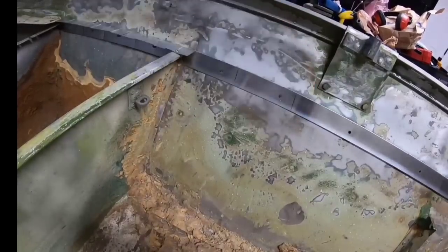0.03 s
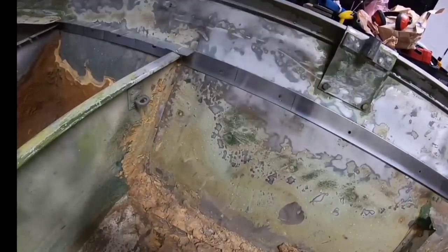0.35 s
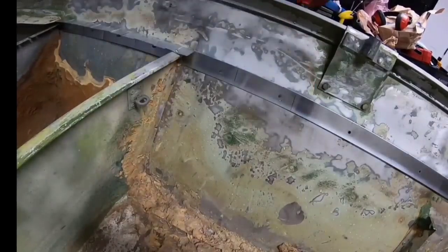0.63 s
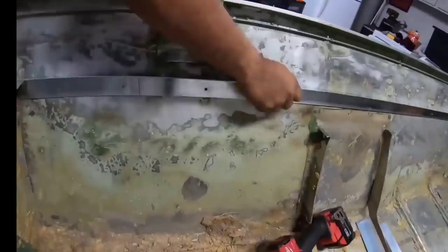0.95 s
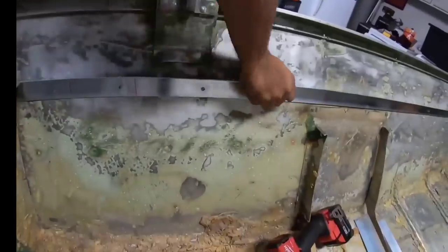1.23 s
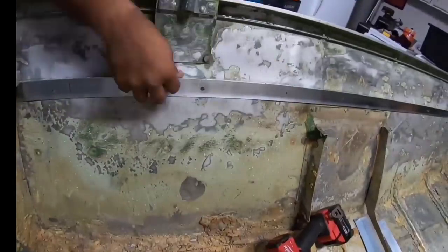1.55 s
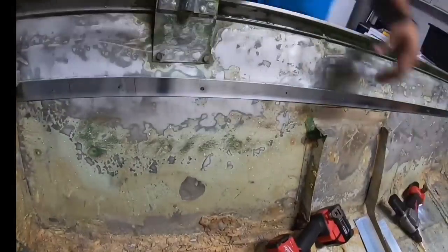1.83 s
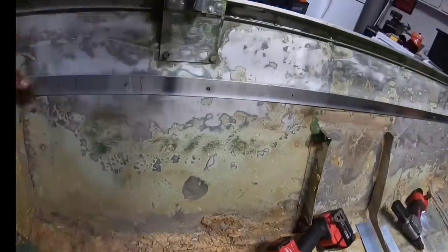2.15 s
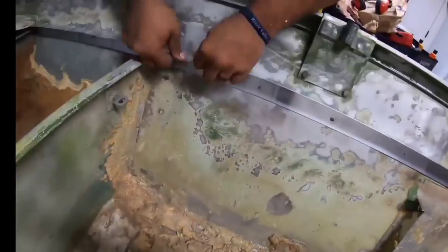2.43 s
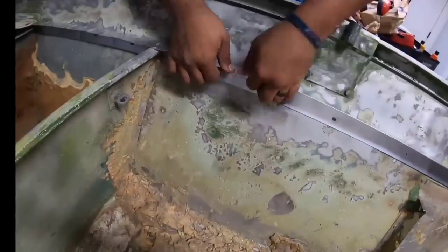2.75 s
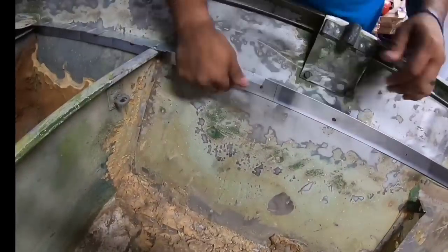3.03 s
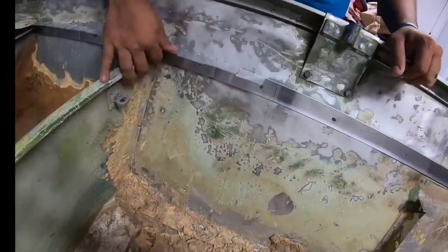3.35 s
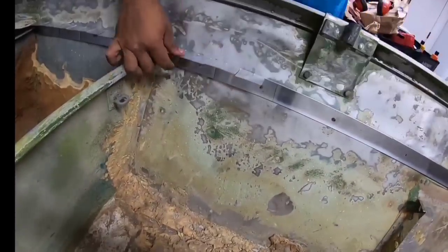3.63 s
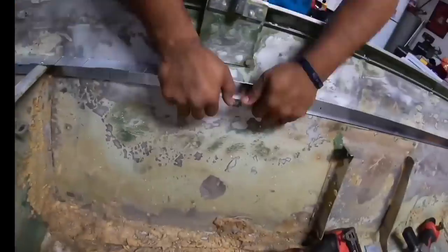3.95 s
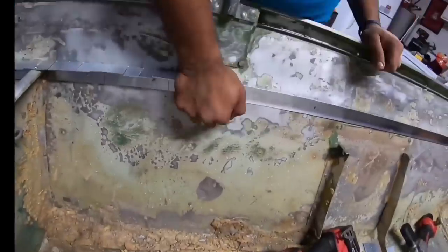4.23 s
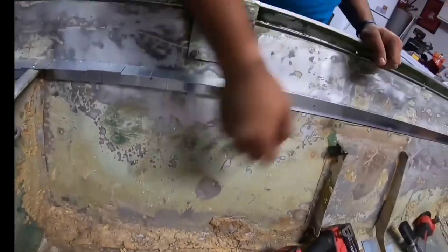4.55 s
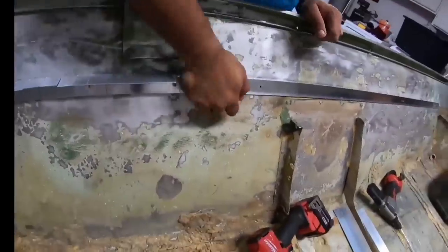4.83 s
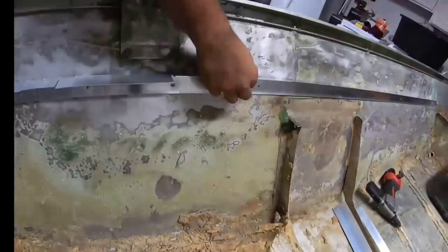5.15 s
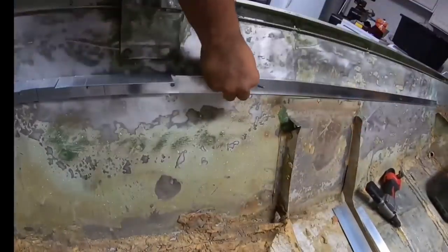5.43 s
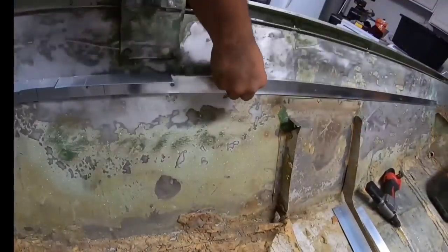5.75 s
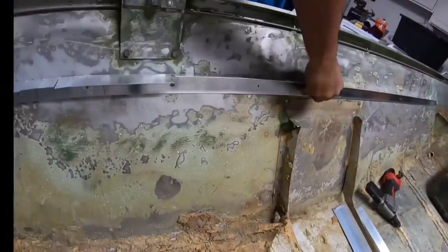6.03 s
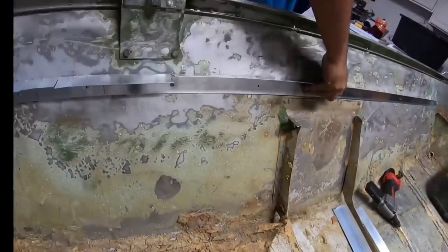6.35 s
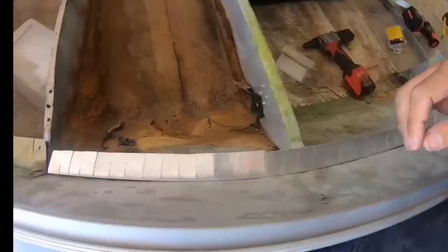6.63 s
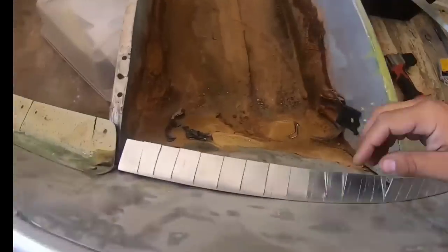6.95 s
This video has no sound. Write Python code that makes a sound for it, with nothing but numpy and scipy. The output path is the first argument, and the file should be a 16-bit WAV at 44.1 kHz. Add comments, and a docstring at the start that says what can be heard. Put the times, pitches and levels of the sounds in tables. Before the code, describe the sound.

A thin metal strip taps and rings on a boat hull amid faint rubbing, ending in loud, squeaky metal-on-metal scrapes.

```python
"""Hands hiss faintly over metal, pressing a thin aluminium strip along the inside of a boat hull.
An arm's length away, the mount of a head-worn camera bumps and creaks. The strip is slid and patted into
place, ringing with the hull; a low clatter and one dull thud sound in the distance. Then come four hard
scrapes of metal on metal: the edge catches, squeals by stick-slip and drives the limiter.
The sound breaks off and a dull room tone follows."""
import sys
import numpy as np
from scipy import signal
from scipy.fft import rfft, irfft, next_fast_len
from scipy.io import wavfile
from scipy.ndimage import uniform_filter1d, minimum_filter1d

SR = 44100
rng = np.random.default_rng(int(sys.argv[2]) if len(sys.argv) > 2 else 0)


def to_wav(s):
    """Save 16-bit WAV."""
    ch = np.atleast_2d(s).T  # columns
    pcm = np.round(np.clip(ch, -1, 1) * 32767)  # PCM
    wavfile.write(sys.argv[1], SR, pcm.astype(np.int16))


N = 312404
BASS_HZ, MIDS_HZ, TREBLE_HZ = (200, 900), (900, 4000), (5000, 15000)


def amp(db):
    """Decibels to gain."""
    return 10 ** (np.asarray(db) / 20)


def rms(x):
    """Average level of a sound."""
    return np.sqrt(np.mean(x ** 2) + 1e-20)


def read(points, hz):
    """A curve's value at hz, on a log-frequency axis."""
    f, value = np.transpose(points)
    return np.interp(np.log(hz + 1), np.log(f + 1), value)


def add(mix, s, sound):
    """Lays a sound into the stereo mix at s seconds."""
    part = mix[:, max(round(s * SR), 0):][:, :sound.shape[-1]]
    part += sound[..., :part.shape[1]]


def filtered(x, gain):
    """Applies gain(hz) to a sound."""
    n = next_fast_len(x.shape[-1] + SR // 20)
    return irfft(rfft(x, n) * gain(np.fft.rfftfreq(n, 1 / SR)), n)[..., :x.shape[-1]]


def tinted(x, points):
    """Colours a sound with an EQ curve of (Hz, dB) points."""
    return filtered(x, lambda hz: amp(read(points, hz)))


def band(x, edges):
    """The mono sum between two frequencies."""
    return filtered(x.mean(0), lambda hz: (hz > edges[0]) & (hz < edges[1]))


def wobble(n, rate):
    """A random drift of about unit size that turns rate times a second."""
    knots = rng.standard_normal(SR // 10)
    return np.interp(np.arange(n) * rate / SR, np.arange(len(knots)), knots)


def grains(per_s):
    """Randomly scattered clicks at unit average level."""
    clicks = rng.standard_normal(N) * (rng.random(N) < per_s / SR)
    return clicks / rms(clicks)


# Stereo image. Each row: frequency in Hz, likeness of left and right from 0 to 1.
LIKENESS = [(100, .3), (600, .6), (1400, .935), (3100, .8), (6800, .24), (15000, .19)]

def noise(n):
    """White noise at two microphone ports, narrow in the mids and wide in bass and treble."""
    shared, own = rng.standard_normal(n), rng.standard_normal((2, n))
    centre = filtered(shared, lambda hz: np.sqrt(read(LIKENESS, hz)))
    return centre + filtered(own, lambda hz: np.sqrt(1 - read(LIKENESS, hz)))


# Resonances of strip and hull. Each row: frequency in Hz, width in Hz, strength in dB.
METAL_MODES = [(277.5, 16, 2.5), (536.7, 25.4, 2.5), (697.4, 47, 5), (807.6, 42, -1), (956, 6.8, -2),
               (1299, 51, 0), (1468, 17, -0.5), (1541, 30, -10.5), (1794, 100, -2), (2033, 220, 1),
               (2510, 110, -6.5), (3473, 38.3, -1.5), (3825, 97, -5.5), (6120, 340, -6)]

def ringing(x, lift_db=0):
    """Adds the joint ring of strip and hull to a sound."""
    return filtered(x, lambda hz: 1 + sum(amp(db + lift_db) / (1 + 2j * (hz - f) / width)
                                          for f, width, db in METAL_MODES))


# Tone of the struck metal. Each row: frequency in Hz, gain in dB.
METAL_EQ = [(30, -9), (150, -12), (270, -6.5), (390, -1.5), (600, -5), (1200, 7.5), (2000, -3), (3000, 0),
            (4500, -4), (7000, -8), (11000, -8), (15500, -12.5), (17000, -43.5)]
# Its decay. Each row: frequency in Hz, seconds to fall 60 dB before scaling by ring.
METAL_DECAY = [(100, 0.12), (500, 0.2), (1400, 0.18), (3500, 0.098), (8000, 0.09), (15000, 0.013)]

def sheet(ring, crack_db, crack_s=0.026):
    """The metal struck at one spot: a crack, then crowded modes whose treble dies first."""
    n = SR // 3
    hz, t, spectrum = signal.stft(noise(n), SR, nperseg=256)
    t60 = ring * read(METAL_DECAY, hz)[:, None]
    tail = signal.istft(spectrum * amp(-60 * t / t60), SR)[1][:, :n]
    crack = 1 + amp(crack_db) * np.exp(-np.arange(n) / SR / crack_s)
    return ringing(tinted(tail * crack, METAL_EQ))


def uneven(x, depth_db, spacing_hz):
    """Each spot on the metal has its own random peaks and dips in tone."""
    knots = rng.standard_normal(SR // 20)
    return filtered(x, lambda hz: amp(depth_db * np.interp(hz / spacing_hz, range(len(knots)), knots)))


def wandering(x, rounds_per_s=3.4, spots=3):
    """The contact moves from spot to spot, crossfading their colours."""
    turn = np.arange(N) / SR * rounds_per_s
    return sum(np.cos(np.pi * (turn + k / spots)) ** 4 * uneven(x, depth_db=5.5, spacing_hz=139.7)
               for k in range(spots))


def sweep(start, end, rise_s, fall_s):
    """Envelope of one movement, fastest mid-stroke."""
    t = np.arange(N) / SR
    speed = 0.91 + 0.18 * np.sin(np.pi * np.clip((t - start) / (end - start), 0, 1))
    attack = np.clip((t - start) / rise_s + .5, 0, 1)
    return speed * attack * np.exp(-np.clip((t - end) / fall_s, 0, 20))


# A hand slides along the metal. Each row: start and end in seconds, hiss level in dB.
HAND_SLIDES = [(0, 0.133, -64), (0.332, 0.376, -62.5), (0.487, 0.538, -53.5), (0.677, 0.742, -56),
               (1.25, 1.327, -33.5), (1.512, 1.566, -58.5), (1.612, 1.694, -55.5), (1.727, 1.784, -48.5),
               (1.96, 2.031, -48), (2.182, 2.236, -46), (2.398, 2.452, -48), (2.73, 2.887, -46.5),
               (3.033, 3.082, -52), (3.365, 3.469, -52), (3.556, 3.664, -54.5), (3.773, 3.852, -53),
               (3.98, 4.016, -50), (4.118, 4.196, -52.5), (4.295, 4.374, -52), (4.486, 4.583, -52),
               (4.702, 4.77, -55), (4.9, 4.952, -52), (5.053, 5.119, -53), (5.209, 5.26, -55.5)]
# Low rumbles and shifts of metal, with a distant clatter.
# Each row: start and end in seconds, ring level in dB, rumble offset in dB.
METAL_SHIFTS = [(0.805, 0.922, -52.5, -11), (0.999, 1.034, -56.5, 13), (1.109, 1.287, -47.5, -1.5),
                (1.473, 1.724, -69.5, 14), (2.523, 2.597, -50.5, -9.5), (2.674, 2.731, -47, -14.5),
                (2.873, 2.896, -51.5, -1.5), (3.055, 3.081, -47, -21), (3.198, 3.288, -53, -13),
                (3.378, 3.468, -47.5, -2), (4.174, 4.227, -49, -12.5), (4.393, 4.481, -50, -9.5),
                (4.572, 4.58, -47, -21), (4.962, 5.133, -53, 2)]

def handling(hold_s=(1.0, 5.7), fidget_db=4):
    """Envelopes of hiss, ring and rumble: slides hiss, shifts ring or rumble, the held strip stirs."""
    held = sweep(*hold_s, rise_s=0.034, fall_s=0.039) * amp(fidget_db * wobble(N, rate=25))
    levels = amp([-70, -65, -76])[:, None] * held  # hiss, ring, rumble
    for start, end, db in HAND_SLIDES:
        slide = amp([db, db - 11, db - 27])[:, None] * sweep(start, end, rise_s=0.014, fall_s=0.011)
        levels = np.maximum(levels, slide)
    for start, end, db, rumble_db in METAL_SHIFTS:
        shift = amp([db, db + rumble_db])[:, None] * sweep(start, end, rise_s=0.0056, fall_s=0.022)
        levels[1:] = np.maximum(levels[1:], shift)
    return levels


# Tone of skin hiss, strip ring and hull rumble. Each row: frequency in Hz, gain in dB.
SKIN_EQ = [(500, -35), (1500, -18), (3000, -8), (5000, -0.5), (6200, 4), (9000, 2.5), (12000, -1.5),
           (15500, -7.5)]
STRIP_EQ = [(300, -42.5), (950, -16), (1300, 3), (2200, -2.5), (3200, -4), (6000, -9.5), (15000, -19.5)]
HULL_EQ = [(30, -27), (100, -20.5), (250, -8), (700, -4), (1000, -10.5), (2000, -18), (6000, -59)]

def rubs(flutter_db=3.5, grit_db=3.5, ticks_per_s=22, tick_db=-12):
    """Sliding skin hisses, grit makes the metal whisper unevenly and tick, and the hull rumbles."""
    hiss_level, ring_level, rumble_level = handling()
    hiss, ring, rumble = (ringing(wandering(tinted(noise(N), eq))) for eq in (SKIN_EQ, STRIP_EQ, HULL_EQ))
    pressure = amp(flutter_db * wobble(N, rate=51))
    grit = amp(grit_db * wobble(N, rate=260))
    clicks = grains(ticks_per_s) * ring_level
    spot = tinted(sheet(ring=0.25, crack_db=14), [(600, -6), (1500, 4.5)])
    ticks = signal.oaconvolve(clicks[None], spot / np.linalg.norm(spot[0]), axes=1)[:, :N]
    friction = (hiss_level * hiss / rms(hiss)
                + grit * ring_level * ring / rms(ring)
                + rumble_level * rumble / rms(rumble))
    return amp(tick_db) * ticks + pressure * friction


# Tone of the room behind the work. Each row: frequency in Hz, gain in dB.
ROOM_EQ = [(24, -27.5), (40, -4), (54, -20), (263, -6.5), (980, -15), (1350, -0.5), (4340, -10.5),
           (4790, -8), (6950, -7.5), (15000, -7.5)]

def room_tone(eq=ROOM_EQ, level_db=-70.5):
    """A steady bed of soft noise."""
    air = tinted(noise(N), eq)
    return amp(level_db) * air / rms(air)


def voiced(x, bass_db, mid_db, treble_db):
    """EQs a hit so that its first 10 ms come near the given level in each band."""
    low, mid, high = (db - 20 * np.log10(rms(band(x, edges)[:SR // 100]))
                      for db, edges in ((bass_db, BASS_HZ), (mid_db, MIDS_HZ), (treble_db, TREBLE_HZ)))
    return tinted(x, [(650, low), (1200, mid), (2150, mid), (5000, high)])


# Knocks on the hull: strip slaps and one dull, distant thud.
# Each row: start in seconds, level in dB, brightness in dB.
HULL_KNOCKS = [(0.057, -74, 29), (1.0225, -32, 3), (1.1207, -22.5, -2), (1.1558, -15.5, 0.5),
               (1.175, -24.5, 2), (1.3212, -14.5, -0.5), (1.6323, -42.5, -39), (1.799, -18, 1),
               (1.83, -20.5, -0.5), (2.0704, -45, 7.5), (2.3697, -31, 8.5), (2.615, -41, 5.5),
               (3.009, -26.5, -1.5), (3.2057, -39, 13.5), (3.2808, -51, 21.5), (3.4302, -31, 3),
               (3.7919, -44.5, 13.5), (4.0282, -22, -5), (4.155, -32.5, 10), (4.253, -31.5, -18),
               (4.6158, -31, -5.5), (4.793, -24, -8), (5.002, -36.5, -16), (5.3181, -28.5, -2),
               (5.3544, -23, -10.5), (5.372, -30.5, 14.5), (5.688, -14, -13), (5.9352, -25.5, -5.5),
               (6.0711, -28.5, -1), (6.0935, -31.5, -1.5), (6.161, -11.5, 8), (6.181, -16.5, -4.5),
               (6.49, -28.5, -3), (6.507, -17, -16)]

def knocks(loud_db=-20, push=0.62, rise_s=0.00092, chatter_db=2.7):
    """Each knock rings the metal at a new spot and chatters briefly."""
    out = np.zeros((2, N))
    for start, db, bright in HULL_KNOCKS:
        db += push * max(db - loud_db, 0)  # the hardest overshoot into the limiter
        ring = 0.81 * np.interp(bright, [-6, 11], [.95, .5])  # bright ticks die sooner than dull knocks
        hit = uneven(sheet(ring, crack_db=-7.5), depth_db=4.5, spacing_hz=133.7)
        hit = tinted(hit, [(70, -27.5), (140, -1.5), (280, 6)])
        t = np.arange(hit.shape[1]) / SR
        hit *= (1 - np.exp(-t / rise_s)) * amp(chatter_db * wobble(len(t), rate=200))
        hit = voiced(hit, bass_db=db - 16 - 0.46 * bright, mid_db=db - 8, treble_db=db - 19 + bright)
        add(out, start, hit)
    return out


# Modes of the mount's plastic. Each row: frequency in Hz, level in dB, seconds to fall 60 dB.
MOUNT_MODES = [(70, -37, .08), (138, 0, 0.059), (206, -5.5, 0.07), (249.4, 6, 0.042), (336, 2.5, 0.075),
               (473, -8, 0.08), (617, 10.5, 0.039), (800, -0.5, 0.064), (1130, 6, 0.031)]

def mount_thud(t, centre_hz, spread=0.081, rise_s=0.00036):
    """One blow rings the plastic, favouring the modes within an octave of centre_hz."""
    thud = np.zeros(len(t))
    for hz, db, t60 in MOUNT_MODES:
        detune, phase = rng.uniform(-1.63, 1, 2)
        struck = amp(db) / (1 + np.log2(hz / centre_hz) ** 2)
        tone = np.sin(2 * np.pi * hz * (1 + spread * detune) * t + np.pi * phase)
        thud += struck * amp(-60 * t / t60) * tone
    thud = tinted(thud * (1 - np.exp(-t / rise_s)), [(40, -54), (140, 14)])
    return thud / rms(thud[:SR // 100])


# The camera mount bumps and rattles. Each row: start in seconds, level in dB, tone centre in Hz,
# creak offset in dB, seconds between blows, number of blows.
MOUNT_BUMPS = [(0.814, -11.5, 496, -27, 0.016, 2), (0.881, -24, 636, -18, .017, 2),
               (0.935, -23, 770, -16.5, 0.0075, 2), (2.245, -43, 1260, 2.5, .006, 2),
               (2.262, -33, 480, 8, .007, 3), (3.573, -44, 250, -7, 0, 1),
               (3.853, -27, 283, -15, 0.0076, 2), (3.903, -20, 1150, -20, 0, 1),
               (3.914, -22, 264, -32, .021, 3), (4.707, -20.5, 425, -23.5, 0.032, 2),
               (4.759, -23, 292, -24, 0, 1)]

def bumps(thud_db=-6, creak_db=2, rebound_db=-3, left_db=-10, left_lag_s=0.00076, creak_s=0.0081):
    """Dull knocks in the mount, close to the right port, each with a short plastic creak."""
    out, t = np.zeros((2, N)), np.arange(SR // 6) / SR
    creak_eq = [(60, -2), (300, 6), (1200, -6.5), (2500, 0.5), (6000, 3), (15000, -1.5)]
    for start, db, centre_hz, creak_offset_db, gap_s, blows in MOUNT_BUMPS:
        for k in range(round(blows)):
            s, gain = start + k * gap_s, amp(db + k * rebound_db)
            thud = gain * amp(thud_db) * mount_thud(t, centre_hz)
            add(out, s, thud * np.array([[0], [1]]))
            add(out, s + left_lag_s, thud * np.array([[amp(left_db)], [0]]))
            creak = tinted(noise(len(t)), creak_eq) * np.exp(-t / creak_s)
            add(out, s, gain * amp(creak_db + creak_offset_db) * creak)
    return out


# Stick-slip notes. Each row: start and end in seconds, first and last pitch in Hz, level in dB.
SQUEALS = [(1.19, 1.219, 136, 131, -50), (1.259, 1.282, 1830, 1518, -45), (1.285, 1.33, 1530, 1520, -44.5),
           (1.255, 1.303, 6930, 6070, -48), (1.424, 1.464, 7430, 7400, -61), (3.42, 3.446, 146, 140, -52.5),
           (3.425, 3.456, 1726, 1788, -44.5), (3.43, 3.483, 2185, 2200, -46.5),
           (5.397, 5.416, 703, 693, -20.5), (5.421, 5.459, 1250, 1296, -23.5),
           (5.464, 5.491, 1308, 1324, -15.5), (5.46, 5.484, 3410, 3430, -28),
           (5.522, 5.534, 1760, 1880, -26), (5.667, 5.679, 5230, 4880, -30),
           (5.846, 5.871, 676, 721, -24.5), (5.88, 5.925, 768, 762, -41.5), (6.25, 6.34, 529.4, 540, -37),
           (6.557, 6.598, 1526, 1605, -25.5), (6.59, 6.65, 505, 536, -38)]

def squeals(waver=0.0073, flutter_db=3, rise_s=0.0025, t60=0.1, octave_db=-22):
    """Slips fall into step with a mode: a short wavering note that rings on when let go."""
    out, t = np.zeros((2, N)), np.arange(SR // 4) / SR
    for start, end, first_hz, last_hz, db in SQUEALS:
        glide = np.interp(t, [0, end - start], [first_hz, last_hz])
        phase = 2 * np.pi * np.cumsum(glide * (1 + waver * wobble(len(t), rate=420))) / SR
        tone = np.sqrt(2) * (np.sin(phase) + amp(octave_db) * np.sin(2 * phase))
        swell = (1 - np.exp(-t / rise_s)) * amp(-60 * np.maximum(t - end + start, 0) / t60)
        add(out, start, amp(db + flutter_db * wobble(len(t), rate=38)) * swell * tone)
    return out


# The edge is dragged over the hull. Each row: start and end in seconds, force in dB,
# bite (treble offset) in dB.
SCRAPE_STROKES = [(5.392, 5.532, -27, 1), (5.583, 5.613, -38.5, -11), (5.684, 5.809, -21.5, -1),
                  (5.838, 5.86, -24.5, -2), (5.947, 5.966, -44.5, -6), (5.989, 6.019, -39.5, -0.5),
                  (6.17, 6.356, -26.5, 1.5), (6.507, 6.657, -26, 0)]

def strokes(skid_s=0.021, skid_db=-12, grip_s=0.043, snag_s=0.023, lift_db_per_s=1000):
    """Force and bite of the edge: it skids lightly, grips, runs on, snags at the end and lifts."""
    t, force, bite = np.arange(N) / SR, np.zeros(N), np.zeros(N)
    for start, end, force_db, bite_db in SCRAPE_STROKES:
        grip = (t >= start) * np.exp(-abs(t - start) / grip_s)
        snag = np.exp(-abs(t - end) / snag_s)
        lift_db = lift_db_per_s * np.maximum(t - end, 0)
        shape_db = skid_db * (t < start) + 0.5 * grip + 2.5 * snag - lift_db
        stroke = (t >= start - skid_s) * amp(force_db + shape_db)
        bite = np.where(stroke > force, amp(bite_db - 6.5 * grip), bite)  # digs in dull, then brightens
        force = np.maximum(force, stroke)
    return force, bite


def scrapes(level_db=2, rasp_db=-3.5, slips_per_s=1200, grind=0.8, judder_db=0.4, crossover_hz=4800):
    """The edge grinds and slips over burrs: dense tiny blows ring one spot of the metal after another."""
    force, bite = strokes()
    slips = grains(slips_per_s)
    judder = amp(judder_db * wobble(N, rate=89))
    drive = (slips + grind * rng.standard_normal(N)) * judder
    # the treble comes straight off the contact as a rasp; the sheet carries the rest
    direct = lambda hz: 1 / (1 + (crossover_hz / (hz + 1)) ** 6)
    rasp = filtered(tinted(noise(N), METAL_EQ), lambda hz: np.sqrt(direct(hz)))
    out = rasp / rms(band(rasp, TREBLE_HZ)) * judder * bite * force * amp(rasp_db)
    drive = filtered(drive, lambda hz: np.sqrt(1 - direct(hz))) / rms(drive) * force
    hop = SR // 25
    for first in range(0, N - 2 * hop, hop):
        blows = drive[first:first + 2 * hop] * signal.windows.cosine(2 * hop)
        if blows.any():
            # pressed hard, the strip couples more strongly to the hull
            spot = ringing(sheet(ring=0.97, crack_db=13, crack_s=0.0037), lift_db=-11.5)
            spot /= np.linalg.norm(band(spot, MIDS_HZ))
            add(out, first / SR, signal.fftconvolve(blows[None], spot, axes=1))
    return amp(level_db) * out


# Notes of the strip's free end. Each row: pitch in Hz, level against the scraping force in dB,
# seconds to fall 60 dB.
FREE_END_NOTES = [(2169, -28, .52), (2676, -32, .55)]

def free_end():
    """Fed by the scraping force, the lightly damped free end sings on in two thin notes."""
    t, out = np.arange(N) / SR, np.zeros(N)
    force, _ = strokes()
    for hz, db, t60 in FREE_END_NOTES:
        decay = amp(-60 / (t60 * SR))
        swell = signal.lfilter([1 - decay], [1, -decay], force)
        out += amp(db) * swell * np.sin(2 * np.pi * hz * t)
    return out


# Tone of the dull room at the end. Each row: frequency in Hz, gain in dB.
DULL_ROOM_EQ = [(18, -34), (30, -20), (87, -6.5), (240, -12.5), (337, -21.5), (774, -19.5), (859, -26),
                (1090, -27), (1650, -26.5), (3780, -24.5), (4900, -37), (15000, -65)]

def dull_room(start_s=6.79, fade_s=0.055):
    """A low, muffled room tone fades in."""
    fade = np.clip((np.arange(N) / SR - start_s) / fade_s, 0, 1)
    return room_tone(DULL_ROOM_EQ, level_db=-69.5) * fade


def scene(break_s=6.692, cut_s=0.00057):
    """The scene changes abruptly: the work cuts off and the dull room follows."""
    work = knocks() + scrapes() + free_end() + squeals() + rubs() + bumps() + room_tone()
    cut = np.exp(-np.maximum(np.arange(N) / SR - break_s, 0) / cut_s)
    return work * cut + dull_room()


def record(dry, ceiling_db=-14, release_db_per_s=600, cutoff_hz=15650):
    """A fast peak limiter flattens the scrapes and hardest hits; a steep low-pass trims the top."""
    over_db = np.maximum(20 * np.log10(abs(dry).max(0) + 1e-9) - ceiling_db, 0)
    release = np.arange(N) * release_db_per_s / SR
    reduction_db = np.maximum.accumulate(over_db + release) - release
    gain_db = uniform_filter1d(minimum_filter1d(-reduction_db, size=45), size=45)  # 1 ms look-ahead
    low_pass = signal.firwin(511, cutoff_hz, window=("kaiser", 9), fs=SR)
    return signal.oaconvolve(dry * amp(gain_db), low_pass[None], "same")


dry = scene()
out = record(dry)
to_wav(out)
```